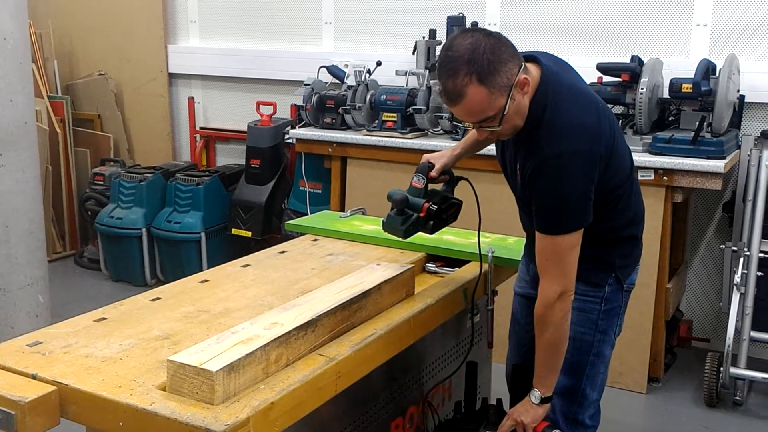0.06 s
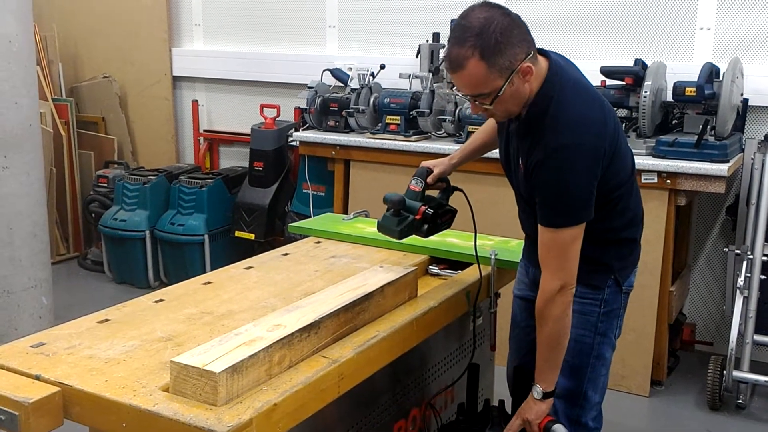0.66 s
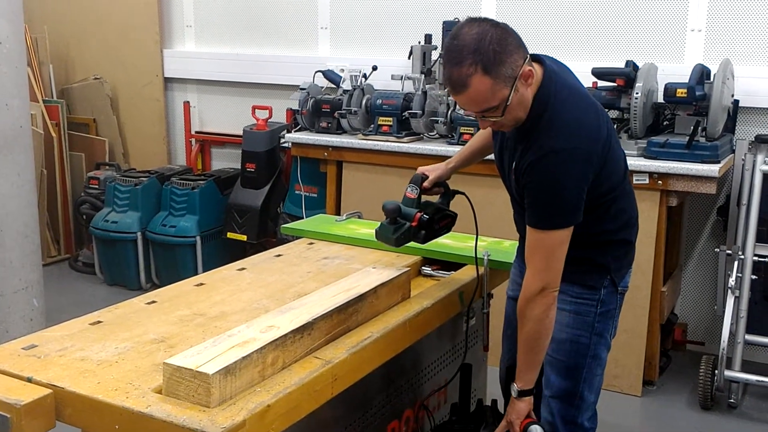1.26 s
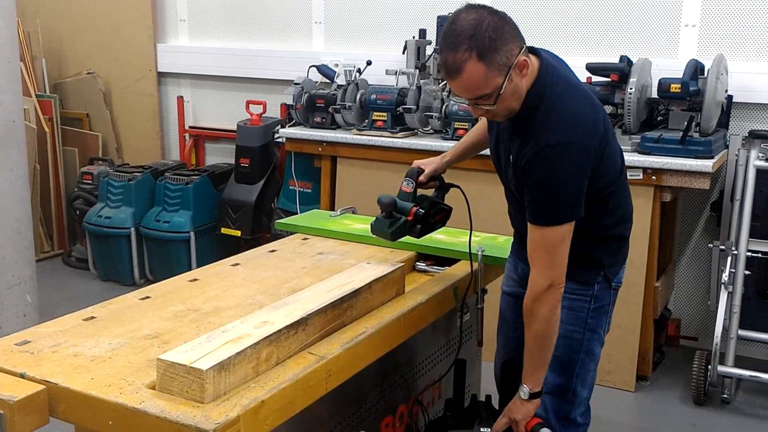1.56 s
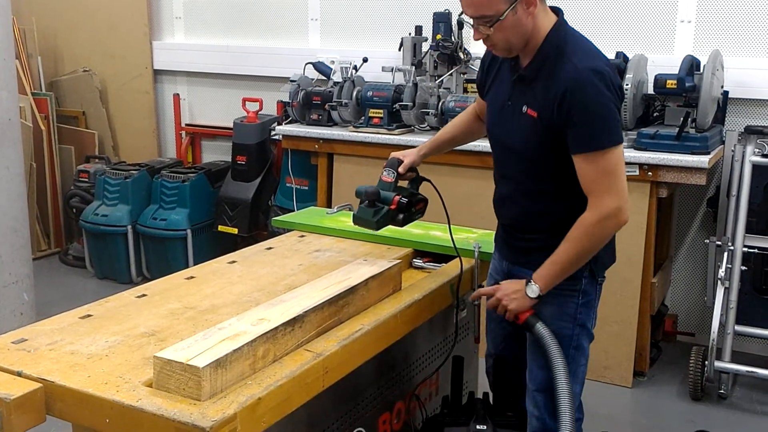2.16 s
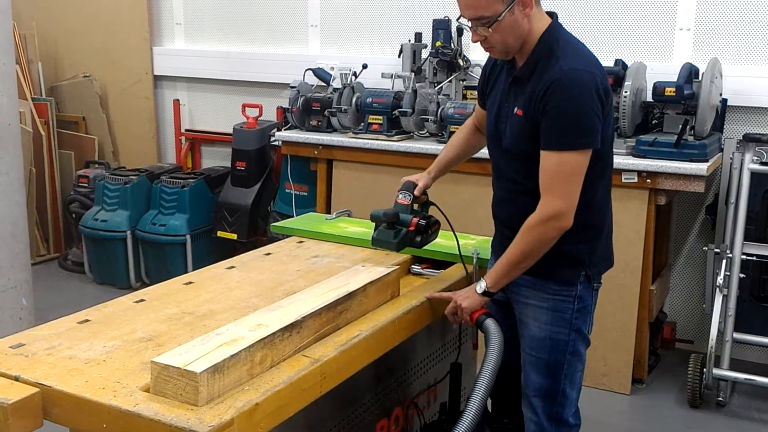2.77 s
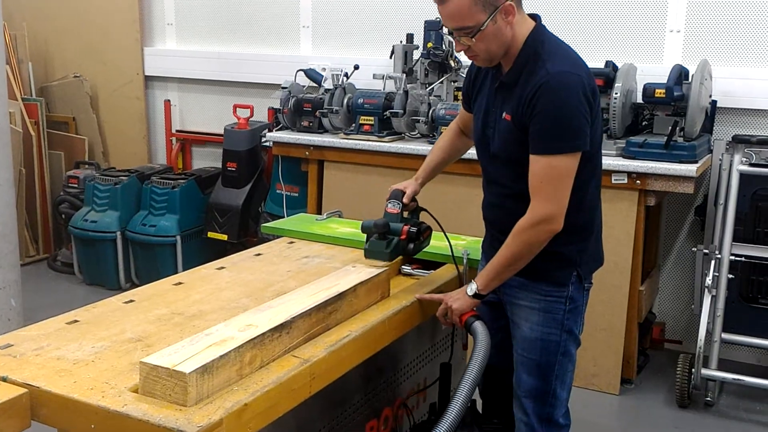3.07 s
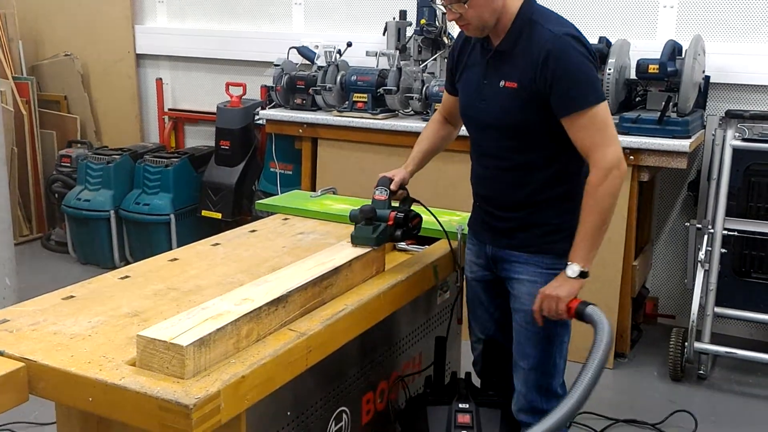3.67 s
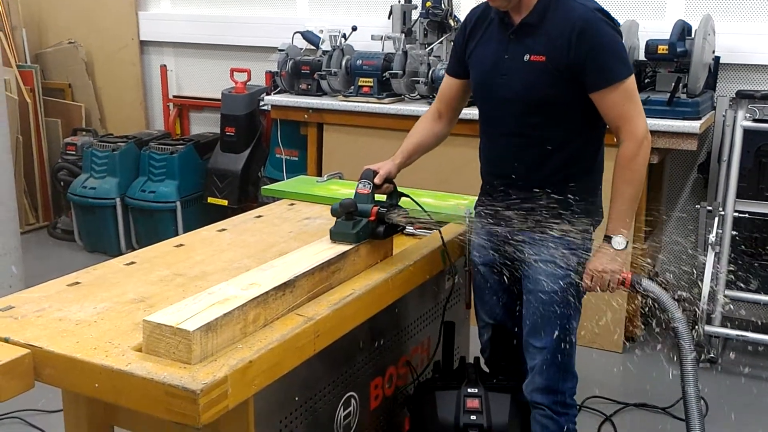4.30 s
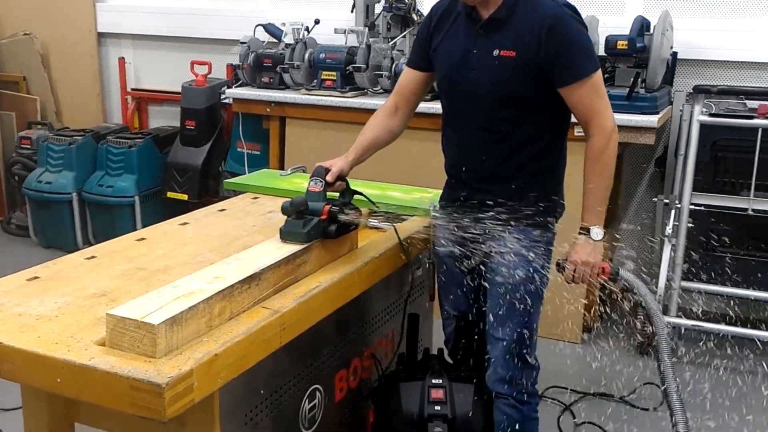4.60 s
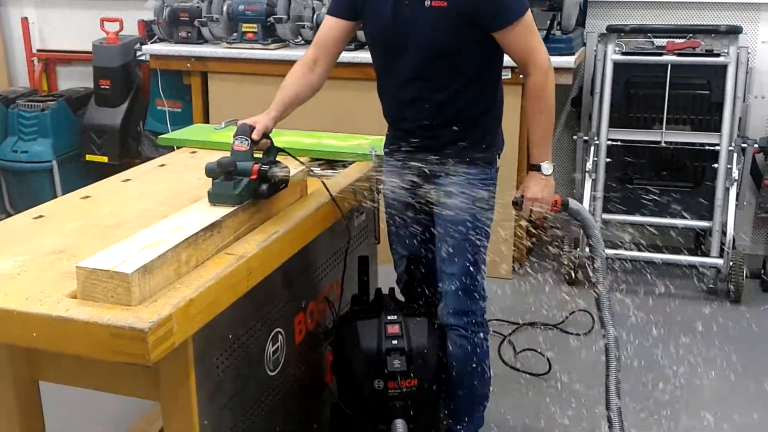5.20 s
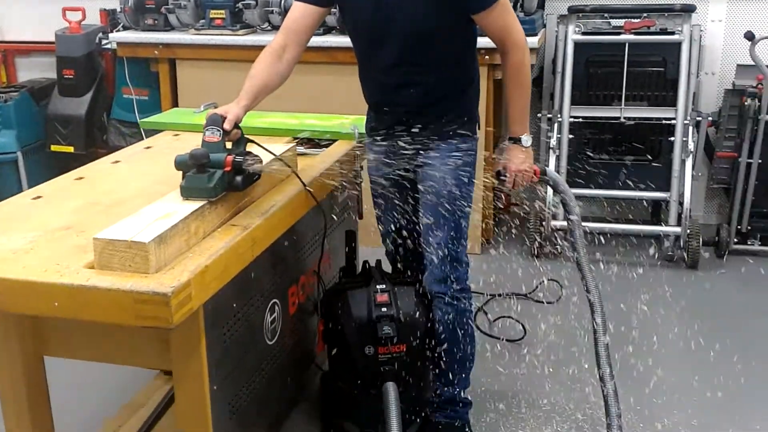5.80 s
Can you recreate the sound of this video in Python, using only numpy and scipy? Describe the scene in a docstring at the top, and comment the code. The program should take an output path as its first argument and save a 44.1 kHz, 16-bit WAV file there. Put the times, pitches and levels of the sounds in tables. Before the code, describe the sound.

In a quiet workshop, hands faintly rustle and tap on a hose and tool before a plastic switch clacks sharply. With a second click, an electric hand planer spins up into a rushing whir, and a shop vacuum's whine rises behind it. The planer then bites into a wooden beam, giving a loud, rasping buzz that sags in pitch while chips hiss out. Everything is heard close on one microphone.

```python
"""An electric hand planer at a workshop bench, heard close on one microphone, a shop vacuum behind it.
Hands shift hose and tool, a switch clacks, and the planer's drum spins up, whipping air through its
housing while the vacuum's impeller winds up to a whine. Then the knife bites into a wooden beam:
the drum slows, each stroke rings housing and beam, fibres tear and chips spray out.
Standing waves in the room make the tones flicker at the microphone."""
import sys
import numpy as np
from scipy import signal
from scipy.fft import rfft, irfft, next_fast_len
from scipy.io import wavfile

SR = 44100
rng = np.random.default_rng(int(sys.argv[2]) if len(sys.argv) > 2 else 0)


def wav_out(sig):
    """Save sig, one row per channel (or a flat mono array), as 16-bit PCM at SR to the path in sys.argv[1]."""
    wavfile.write(sys.argv[1], SR, np.round(np.clip(np.atleast_2d(sig).T, -1, 1) * 32767).astype(np.int16))


N = 257984
TIME = np.arange(N) / SR
MOTOR_START_S, CUT_START_S, FULL_TURNS_PER_S = 1.963, 3.717, 300
ALOFT, LOWERED, ON_WOOD = range(3)   # how the planer is held

# Room tone at the microphone: time_s, level_db
ROOM_LEVEL = [(0, -57.5), (0.7, -60.5), (1.6, -60), (2.2, -57), (2.7, -62), (3.8, -59), (4.5, -65)]
# Its spectrum; every COLOUR gives only a shape, per Hz: pitch_hz, level_db
ROOM_COLOUR = [(20, 5), (55, 0), (120, -16.5), (200, -14), (300, -18), (550, -23.5), (1500, -28),
               (3200, -28.5), (4300, -41), (5500, -39), (8300, -32.5), (11000, -41), (15000, -47)]
# The vacuum's hum in soft start, run and a brief swell: start_s, length_s, at_100_hz_db, at_200_hz_db
HUM_SPELLS = [(2.223, 0.38, -56.5, -40.5), (2.24, 5.9, -62.5, -62), (3.374, 0.3, -53, -52.5)]

# Sleeve, hose and cord sliding: middle_s, length_s, level_db, brightest_hz
SCRAPES = [(0.1, 0.11, -58.5, 2800), (0.298, 0.13, -63, 3020), (0.563, 0.04, -68, 3100),
           (0.804, 0.032, -54.5, 2100), (0.99, 0.031, -64, 3000), (1.85, 0.07, -65, 3000)]
# Hands on hose and tool: start_s, tick_strength_db, thud_over_tick_db
TOUCHES = [(0.095, -45, 7), (0.122, -46, 3), (0.248, -52, 9), (0.552, -43, -2), (0.758, -58, 15),
           (0.776, -40, 0), (0.802, -47, 6.5), (0.877, -48.5, 5), (1.226, -45, -10), (1.255, -40, -14),
           (1.563, -58, 16), (1.782, -57, 11), (1.885, -40.5, -12), (1.913, -50, 12)]
# The vacuum's switch snaps and bounces, later the planer's trigger: start_s, strength_db
SNAPS = [(1.1329, -15.5), (1.13505, -12.5), (1.1379, -22), (1.1423, -28), (1.9628, -23)]
# Modes of the switch's plastic shell: pitch_hz, width_hz, gain_db
SHELL_MODES = [(1940, 140, 3), (2400, 160, 2), (3100, 220, 5.5), (3380, 140, 5), (3860, 140, 6)]
# Spectra of the small sounds around the bench: pitch_hz, level_db
SCRAPE_COLOUR = [(400, -4), (1500, -6), (3300, -1.5), (4500, -17)]
KNOCK_COLOUR = [(110, -20), (250, -9), (500, -7), (800, 1), (1200, -7.5), (1600, -9), (2200, -12),
                (3000, -27)]   # dull knock on plastic
SWITCH_COLOUR = [(180, -34), (400, -32), (580, -27), (760, -12), (1150, -6), (1550, -21.5), (2300, -1),
                 (2700, -4), (3100, 0.5), (3600, -7), (4350, -11), (4900, -25), (5800, -42), (8500, -35),
                 (12000, -45), (15000, -54)]   # hard tick on plastic
SWITCH_BODY_COLOUR = [(140, -18), (200, 10), (300, -12), (480, -9)]   # hollow body behind the switch

# The free drum overshoots, sags and settles: time_s, turns_per_s
SPIN_UP = [(1.96, 10), (2.02, 125), (2.06, 192), (2.12, 240), (2.16, 266), (2.33, 245), (2.6, 256),
           (3.1, 296), (3.72, 302)]
# Hollows of housings and hose: pitch_hz, width_hz, aloft_db, lowered_db, on_wood_db
HOLLOWS = [(307, 37, 5.5, 3, 4.5), (392, 34, 8, 7, 6), (545, 23, 7.5, -2, 5), (737, 34, -3, 6, 4),
           (806, 58, 6.5, 5, 5.5), (992, 70, 9.5, 7, 4.5), (1119, 16, 13.5, -3, 3),
           (1173, 12, -9, 5.5, -1.5), (1860, 110, 4, 4, 6.5), (2270, 30, 1, 7, -3), (2400, 54, -6, 6, 16),
           (2597, 30, 6, 7, -5), (3304, 110, -8.5, 2.5, -2), (3504, 70, 6, 4.5, -2)]
# Spectra of the planer running free: pitch_hz, level_db
RUSH_COLOUR = [(1550, -14.5), (1700, -47), (1850, -3.5), (2150, -4.5), (2350, -2), (3000, -3), (3400, -1.5),
               (3900, -13), (4500, -18.5), (5200, -42.5), (6200, -39)]   # upper band of the whipped air
ROAR_COLOUR = [(53, -66), (90, -58), (124, -20.5), (193, -11), (304, -5.5), (344, -10.5), (398, -4.5),
               (549, -6), (737, -1), (875, -5), (1200, -2.5), (1520, -14), (1700, -4), (2210, -34),
               (3740, -120)]   # its lower band
SURGE_COLOUR = [(1500, -17), (2300, 3.5), (2700, -3), (3200, -5), (3900, -18)]   # the motor's starting snarl
CHUTE_AIR_COLOUR = [(5000, 3), (6000, -6.5), (7200, -1.5), (8600, -1), (9500, -5.5), (11000, -12.5),
                    (12500, -13), (13500, -32)]
# How well the housings let a whine out: pitch_hz, gain_db
WHINE_COLOUR = [(1400, -2), (3400, 2), (4000, 1), (4500, -5.5), (4900, -12), (5250, -22), (5600, -45),
                (6900, -22), (7600, -28), (8300, -17.5), (9600, -14), (11200, -23)]
# The vacuum's impeller, then its suction whistle, ahead of the housing:
# start_s, sunk_after_s, start_hz, final_hz, time_constant_s, width_hz, level_db, octave_db
WIND_UPS = [(2.27, 0.4, 2400, 5683, 0.285, 115, -33, -42), (2.72, 0.82, 3550, 6080, 0.68, 74.9, -39, -53)]

# The drum slows under load: time_s, strokes_per_s
STROKE_RATE = [(3.72, 301), (3.79, 292.3), (3.88, 280.1), (4.0, 264.3), (4.15, 250.5), (4.44, 243.6),
               (4.6, 243.1), (4.8, 241.6), (4.98, 237.2), (5.14, 234.6), (5.4, 233.8), (5.67, 233.4),
               (5.85, 227)]
# How the knife bites: time_s, buzz_db, brightness_db_per_octave, edge_db, rasp_db
BITE = [(3.72, -22, -1, 1, -20), (3.81, -28, 3.5, 0, -21.5), (3.92, -29.5, -1.5, -8, -21),
        (4.03, -28.5, -2, -8, -23), (4.27, -28.5, -3.5, -0.5, -21.5), (4.75, -29, -3, 0, -22),
        (5.1, -32.5, -4, 4, -24), (5.55, -33, 4.5, -4.5, -24), (5.85, -30, -1.5, 2.5, -21)]
# Modes of bench and beam that lift or swallow a passing harmonic: pitch_hz, width_hz, gain_db
BEAM_MODES = [(717, 15, -11), (790, 54, -1.5), (957, 32, 12), (1227, 37, 7), (1404, 16, 2), (1490, 49, 4),
              (2300, 33, 9.5), (2420, 48, 6), (2670, 45, -2.5)]
# The beam squeals on single harmonics as the planer travels: middle_s, length_s, harmonic, level_db
SQUEALS = [(3.735, 0.033, 10, -23), (3.74, 0.049, 13, -22), (3.74, 0.035, 14, -27),
           (3.785, 0.023, 9, -17.5), (3.78, 0.13, 5, -31), (3.816, 0.032, 10, -15),
           (3.822, 0.065, 11, -15.5), (3.838, 0.05, 8, -22), (3.85, 0.055, 12, -24.5),
           (3.885, 0.039, 10, -20), (3.899, 0.055, 11, -19), (3.949, 0.036, 10, -19),
           (3.965, 0.063, 8, -25.5), (4.002, 0.073, 12, -20), (4.025, 0.041, 11, -16.5),
           (4.025, 0.07, 10, -19), (4.093, 0.066, 12, -18.5), (4.188, 0.046, 12, -23),
           (4.288, 0.13, 7, -28.5), (4.3, 0.22, 10, -23.5), (4.343, 0.14, 13, -25.5),
           (4.375, 0.09, 11, -25), (4.58, 0.16, 10, -24), (4.675, 0.18, 14, -24), (4.725, 0.19, 9, -27.5),
           (4.787, 0.1, 13, -23), (4.903, 0.063, 12, -21.5), (4.928, 0.13, 11, -19.5),
           (4.92, 0.11, 19, -34.5), (5.032, 0.1, 14, -27), (5.043, 0.09, 15, -28), (5.105, 0.24, 11, -19.5),
           (5.237, 0.13, 14, -23), (5.358, 0.19, 13, -18), (5.531, 0.3, 11, -21.5), (5.56, 0.36, 10, -28),
           (5.58, 0.24, 14, -26), (5.59, 0.17, 9, -33.5), (5.716, 0.34, 12, -22.5), (5.82, 0.084, 13, -20)]
# Harder, brighter tearing against the grain: middle_s, length_s, level_db
TEAR_OUTS = [(3.735, 0.04, -32), (4.257, 0.27, -29.5), (5.042, 0.14, -36), (5.77, 0.2, -33)]
# Hollow ring of the beam under the whole sole: pitch_hz, width_hz, gain_db
BOOM_MODES = [(524.3, 26, 16), (708, 22, 16), (830, 40, 5), (924, 49, 5)]
# Spectra of the cut: pitch_hz, level_db
KNIFE_COLOUR = [(500, -44), (750, 0.5), (970, -17.5), (1220, -14), (1320, -7.5), (1460, -9.5), (1700, -7.5),
                (2200, -3.5), (2550, -0.5), (2900, -2), (3350, -4.5), (3750, -8), (4300, -12.5),
                (5050, -21), (5800, -29), (8800, -41), (13000, -63)]   # a stroke ringing in beam and housing
RASP_COLOUR = [(1200, -36.5), (1600, -15), (2000, -7), (2400, -2.5), (3150, 3), (3600, -5), (4300, -11),
               (4800, -16), (5400, -48), (6500, -31)]   # tearing fibres, also rustling clothes
TEAR_COLOUR = [(3000, -9), (3800, 0), (4500, -3), (4900, -16), (5400, -28)]
RUMBLE_COLOUR = [(70, -44), (110, -19.5), (160, -7), (280, -7.5), (420, -8.5), (560, -5), (760, -0.5),
                 (900, -3.5), (1200, -5), (1600, -9), (2200, -12)]   # low body of the cut, also scuffs
BOOM_COLOUR = [(450, -4.5), (700, -2.5), (950, -2.5)]
HISS_COLOUR = [(5000, -0.5), (6000, -6.5), (7200, -3), (8500, -0.5), (9500, -2.5), (11000, -11.5),
               (13000, -14.5), (14500, -30), (15500, -27)]   # flying chips, also a switch's bright edge


def from_db(db):
    """Decibels to gain."""
    return np.exp(np.asarray(db) * (np.log(10) / 20))


def rms_one(x):
    """Scale to unit rms."""
    return x / np.sqrt(np.mean(x ** 2) + 1e-20)


def in_time(rows):
    """Each column of a curve, sample by sample."""
    times, *columns = np.transpose(rows)
    return [np.interp(TIME, times, column) for column in columns]


def at_hz(points, hz):
    """Read a spectrum in dB; it falls 36 dB an octave beyond its ends."""
    pitches, db = np.transpose(points)
    octave, known = np.log2(np.maximum(hz, 1)), np.log2(pitches)
    return np.interp(octave, known, db) - 36 * np.abs(octave - np.clip(octave, known[0], known[-1]))


def ramp(start_s, length_s):
    """Rises from 0 to 1."""
    return np.clip((TIME - start_s) / length_s, 0, 1)


def swell(middle_s, length_s):
    """A smooth bump of height 1, this long at half height."""
    return 0.5 ** ((2 * (TIME - middle_s) / length_s) ** 2)


def trail(impulses, t60_s):
    """An envelope that jumps at each impulse and dies away."""
    return signal.lfilter([1], [1, -from_db(-60 / (t60_s * SR))], impulses + 1e-18)


def drift(rate_hz):
    """A random wander with a spread near 1."""
    knots = rng.standard_normal(8192)
    return np.interp(TIME * rate_hz * 2, np.arange(len(knots)), knots)


def resonance(hz, centre, width):
    """Power response of one resonance, 1 on top."""
    return 1 / (1 + (2 * (hz - centre) / width) ** 2)


def colour(x, spectrum, resonances=()):
    """Causal (minimum-phase) filter with a broad spectrum and narrow resonances on top."""
    size = 2 * next_fast_len(N // 2 + 8192)
    hz = np.arange(size // 2 + 1) * SR / size
    db = np.maximum(at_hz(spectrum, hz), -90)
    for centre, width, peak_db in resonances:
        db = db + peak_db * resonance(hz, centre, width)
    cepstrum = irfft(np.log(from_db(db)))
    cepstrum[1:size // 2] *= 2
    cepstrum[size // 2 + 1:] = 0
    return irfft(rfft(x, size) * np.exp(rfft(cepstrum)))[:N]


def noise(spectrum, resonances=(), gate=1):
    """Gated turbulence through a body; rms 1."""
    return rms_one(colour(rng.standard_normal(N) * gate, spectrum, resonances))


def angle_of(hz):
    """Running angle of something that turns at this rate."""
    return 2 * np.pi * np.cumsum(hz) / SR


def tone(hz, level_db, wobble):
    """A sine whose pitch trembles a little."""
    return from_db(level_db) * np.sqrt(2) * np.sin(angle_of(hz * (1 + wobble * drift(90))))


def grains(per_s, spread_db):
    """Random clicks of uneven size; rms 1."""
    sizes = from_db(spread_db * np.minimum(rng.exponential(1, N), 4)) * rng.choice([-1, 1], N)
    return rms_one(sizes * (rng.random(N) < per_s / SR))


def clicks(times, levels_db):
    """One impulse for each contact."""
    out = np.zeros(N)
    out[(np.asarray(times) * SR).astype(int)] = from_db(levels_db)
    return out


def hollows(posture):
    """Resonances of the housings with the tool ALOFT, LOWERED or ON_WOOD."""
    return [(hz, width, levels[posture]) for hz, width, *levels in HOLLOWS]


def workshop(x, near_db, near_t60_s, far_db, far_t60_s):
    """The path to the microphone: direct sound, quick reflections off bench and floor, a weaker tail."""
    t = TIME[:SR // 2]
    decay = from_db(near_db - 60 * t / near_t60_s) + from_db(far_db - 60 * t / far_t60_s)
    response = rng.standard_normal(len(t)) * decay
    response[0] = 1
    return signal.fftconvolve(x, response)[:N]


def room_tone():
    """A low background rumble whose level slowly rises and falls."""
    level_db, = in_time(ROOM_LEVEL)
    return from_db(level_db) * noise(ROOM_COLOUR)


def mains_hum(mains_hz=50, idle_db=-71.5, edge_s=0.032):
    """A faint steady hum in the room, and stronger spells of it from the vacuum's motor."""
    low, high = 0, from_db(idle_db)
    for start, length, low_db, high_db in HUM_SPELLS:
        on = ramp(start, edge_s) - ramp(start + length, edge_s)
        low, high = np.maximum(low, on * from_db(low_db)), np.maximum(high, on * from_db(high_db))
    return low * tone(2 * mains_hz, 0, wobble=.02) + high * tone(4 * mains_hz, 0, wobble=.03)


def scrapes(width_hz=1300):
    """Sleeve, hose and cord slide in short gritty strokes."""
    out = np.zeros(N)
    for middle, length, level_db, hz in SCRAPES:
        grit = noise(SCRAPE_COLOUR, [(hz, width_hz, 9)], gate=from_db(3.3 * drift(150)))
        out += from_db(level_db) * swell(middle, length) * grit
    return out


def handling(clothes_db=-71.5):
    """Hands on hose and tool: a soft tick trails a faint rustle, a thud a short scuff."""
    times, tick_db, thud_db = np.transpose(TOUCHES)
    ticks, thuds = clicks(times, tick_db), clicks(times, tick_db + thud_db)
    knocks = colour(ticks, SWITCH_COLOUR) + colour(thuds, KNOCK_COLOUR)
    rustle_gain = np.hypot(from_db(clothes_db), from_db(-26.5) * trail(ticks, t60_s=0.43))
    rustle = rustle_gain * noise(RASP_COLOUR, gate=from_db(2 * drift(80)))
    scuff = from_db(-27.5) * trail(thuds, t60_s=0.16) * noise(RUMBLE_COLOUR, hollows(ALOFT))
    knocks_at_mic = workshop(knocks, near_db=-31, near_t60_s=.035, far_db=-44, far_t60_s=.2)
    return rustle + scuff + from_db(20) * knocks_at_mic


def switches(shell_hz=3090):
    """Plastic snaps rattle loose parts, ring the shell, boom in the hollow body and linger in the room."""
    snaps = clicks(*np.transpose(SNAPS))
    rattle = from_db(-22) * trail(snaps, t60_s=0.019) * rng.standard_normal(N)
    snap = colour(snaps + rattle, SWITCH_COLOUR, SHELL_MODES)
    ring = from_db(-15) * trail(snaps, t60_s=0.03) * np.sin(2 * np.pi * shell_hz * TIME)
    body = from_db(-42.5) * trail(snaps, t60_s=0.39) * noise(SWITCH_BODY_COLOUR)
    sizzle = from_db(-51) * trail(snaps, t60_s=0.2) * noise(HISS_COLOUR)
    clack = from_db(18) * workshop(snap, near_db=-29.5, near_t60_s=0.07, far_db=-32.5, far_t60_s=0.19)
    return clack + colour(ring, SWITCH_COLOUR) + body + sizzle


def blown_air(spectrum, aloft_db, gate=1):
    """Air whose resonances shift and swell as the planer is lowered to the bench."""
    lowered = ramp(2.435, 0.26)
    before, after = (noise(spectrum, hollows(posture), gate) for posture in (ALOFT, LOWERED))
    return from_db(aloft_db) * np.sqrt(1 - lowered) * before + np.sqrt(lowered) * after


def whine(hz, level_db, width_hz, steady_core=1.2):
    """A gliding tone, coloured by the housing and smeared by turbulence and room into a narrow band."""
    angle = angle_of(hz)
    band = rms_one((steady_core + drift(width_hz)) * np.cos(angle) + drift(width_hz) * np.sin(angle))
    flicker_db = 0.7 * drift(14)   # crossing the room's standing waves
    return from_db(level_db + at_hz(WHINE_COLOUR, hz) + flicker_db) * band


def free_planer(cutting, fan_cycles_per_turn=20.6, armature_cycles_per_turn=27.7):
    """The motor jolts and whines up; its belt-driven drum whips air until the wood closes the mouth."""
    speed, = in_time(SPIN_UP)
    shortfall = FULL_TURNS_PER_S - speed
    rise = ramp(MOTOR_START_S, 0.22)
    chop = (1 + 0.048 * np.cos(angle_of(speed))) * from_db(0.22 * drift(150))
    rush = from_db(-19.5 - 0.05 * shortfall) * blown_air(RUSH_COLOUR, aloft_db=-1.06, gate=chop)
    roar = from_db(-25.5 - 0.0052 * shortfall) * blown_air(ROAR_COLOUR, aloft_db=-2.1) * np.sqrt(rise)
    surge = from_db(-24) * swell(2.027, 0.086) * noise(SURGE_COLOUR, gate=from_db(1.5 * drift(60)))
    fan = whine(fan_cycles_per_turn * speed, -35, width_hz=250)
    armature = whine(armature_cycles_per_turn * speed, -34.5, width_hz=130) * rise
    jolt = tone(180, -35.5, wobble=0.11) * ramp(MOTOR_START_S, 0.0048) * (1 - ramp(MOTOR_START_S, 0.032))
    running_free = ramp(MOTOR_START_S, 0.027) * np.sqrt(1 - cutting ** 2)
    return (rush + roar + surge + fan + armature) * running_free + jolt


def chute(cutting):
    """Blown air hisses with the drum's speed; it turns grainy and bright, and swells, carrying chips."""
    speed, = in_time(SPIN_UP)
    air_db = -44 - 0.07 * (FULL_TURNS_PER_S - speed)
    air = from_db(air_db) * noise(CHUTE_AIR_COLOUR) * ramp(MOTOR_START_S, 0.0054)
    chips_db = -54 + 12.5 * ramp(CUT_START_S, 0.44) + 17.5 * first_blow()
    chips = rng.standard_normal(N) + 0.64 * grains(per_s=2500, spread_db=2)
    spray = from_db(chips_db) * rms_one(colour(chips, HISS_COLOUR))
    return air * (1 - cutting) + spray * cutting


def vacuum(sink_db=7, sink_s=0.1):
    """Behind the planer, impeller and suction whistle climb ever more slowly and sink into the rush."""
    out = np.zeros(N)
    for start, sunk_after, start_hz, final_hz, time_constant, width, level_db, octave_db in WIND_UPS:
        hz = final_hz + (start_hz - final_hz) * np.exp(-np.maximum(TIME - start, 0) / time_constant)
        sunk_db = sink_db * ramp(start + sunk_after - sink_s, sink_s)
        fundamental = whine(hz, level_db - sunk_db, width_hz=width)
        octave = whine(2 * hz, octave_db, width_hz=70)
        out += (fundamental + octave) * ramp(start, 0.11)
    return out


def first_blow(length_s=0.067):
    """Rises and dies as the knife chops into the edge of the beam."""
    return swell(CUT_START_S + length_s / 2, length_s)


def standing_waves(hz, changes_per_s=6, spacing_hz=54.5, full_depth_hz=2400):
    """Reflections lift or cancel a tone at the microphone as the tool travels and the pitch slides."""
    place = changes_per_s * TIME + np.abs(hz - hz[0]) / spacing_hz
    real, imaginary = rng.standard_normal((2, 1024))
    echo = np.interp(place, np.arange(len(real)), real + 1j * imaginary)
    share = 0.75 * np.minimum(hz / full_depth_hz, 1)
    return (1 + share * echo) / np.sqrt(1 + share ** 2)


def harmonic(k, speed, bite_db, brightness, rocking):
    """Strength and phase of one stroke harmonic: coloured by beam and room, at times squealing."""
    hz = k * speed
    level_db = bite_db + at_hz(KNIFE_COLOUR, hz) + brightness * np.log2(np.maximum(hz, 1500) / 2800)
    beam_db = sum(db * resonance(hz, centre, width) for centre, width, db in BEAM_MODES)
    thin_db = -5.5 * rocking * resonance(hz, centre=1950, width=700)   # until the sole is seated
    gain = from_db(level_db + beam_db + thin_db) * standing_waves(hz)
    for middle, length, multiple, db in SQUEALS:
        if round(multiple) == k:
            gain = gain + swell(middle, length) * (from_db(db) - gain)
    return gain


def knife(speed, angle, edge_hz=3100, bench_hz=233.6):
    """One stroke a turn: a ragged first blow, then a ringing pulse whose harmonics slip in phase."""
    bite_db, brightness, edge_db, _ = in_time(BITE)
    scatter = .5 + 1.5 * ramp(3.85, .2) + 2 * first_blow()   # room reflections blur the pulse
    rocking = 1 - ramp(3.84, 0.31)   # the tool chatters until its sole lies flat
    buzz = np.zeros(N)
    for k in range(2, 37):
        hz = k * speed
        sharp_edge_db = edge_db * np.clip((hz - edge_hz) / 600, 0, 1)
        strength = harmonic(k, speed, bite_db + sharp_edge_db, brightness, rocking)
        stutter = from_db((1.18 + 1.5 * rocking) * drift(28))   # knots and fibres
        lag = 2 * np.arctan((hz - 3000) / 600) + 2 * np.arctan((hz - 900) / 250)   # housing, beam ring on
        phase = k * angle - lag + scatter * drift(1.5)
        buzz += stutter * np.sqrt(2) * np.real(strength * np.exp(1j * phase))
    # the bench booms when the stroke rate sinks to its pitch
    drone_gain = from_db(-39 + 1.3 * drift(11)) * resonance(speed, bench_hz, width=14.2)
    drone = drone_gain * np.sqrt(2) * np.cos(angle)
    return (buzz + drone) * from_db(0.57 * drift(120))   # the grain varies every stroke


def planing(cutting):
    """The knife buzzes; each stroke tears a burst of fibres and splinters and sets the beam booming."""
    speed, = in_time(STROKE_RATE)
    angle = angle_of(speed)
    *_, rasp_db = in_time(BITE)
    burst = from_db(2 * np.cos(angle - .9) + 1.1 * drift(120))
    splinters = from_db(-4.5) * rms_one(colour(grains(per_s=780, spread_db=2.5), RASP_COLOUR))
    rasp = from_db(rasp_db) * rms_one(noise(RASP_COLOUR, gate=burst) + splinters)
    against_grain = sum(from_db(db) * swell(middle, length) for middle, length, db in TEAR_OUTS)
    tearing = against_grain * noise(TEAR_COLOUR, gate=burst)
    rumble = from_db(-31.5 + 2.5 * first_blow()) * noise(RUMBLE_COLOUR, hollows(ON_WOOD), burst)
    whole_sole_down = ramp(4.37, 0.46)
    boom = from_db(-37) * whole_sole_down * noise(BOOM_COLOUR, BOOM_MODES, burst)
    buzz = knife(speed, angle + 0.0031 * drift(100)) * ramp(CUT_START_S, .012)
    return buzz + (rasp + tearing + rumble + boom) * cutting


def scene():
    """Planer, handling, vacuum and room meet at one microphone by the bench."""
    cutting = ramp(CUT_START_S, 0.0145)
    room = room_tone()
    planer = free_planer(cutting) + planing(cutting) + chute(cutting)
    return (room + handling() + scrapes() + switches() + planer + vacuum() + mains_hum())[None]


def record(dry, cutoff_hz=15700):
    """The microphone's signal is cut steeply at the top."""
    return signal.sosfilt(signal.ellip(10, .1, 80, cutoff_hz, fs=SR, output="sos"), dry)


dry = scene()
out = record(dry)
wav_out(out)
```